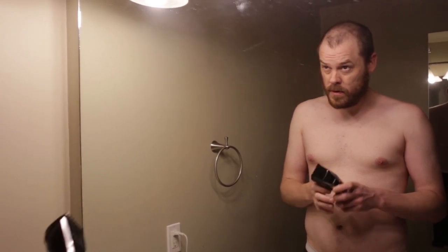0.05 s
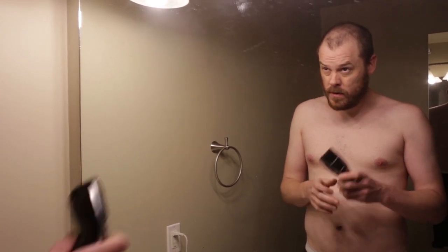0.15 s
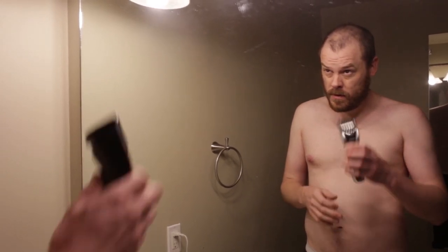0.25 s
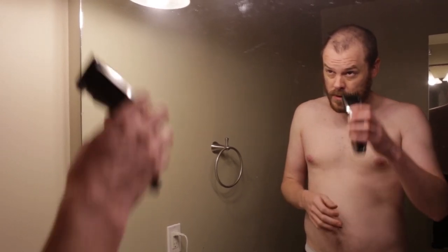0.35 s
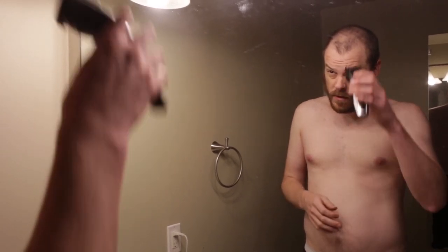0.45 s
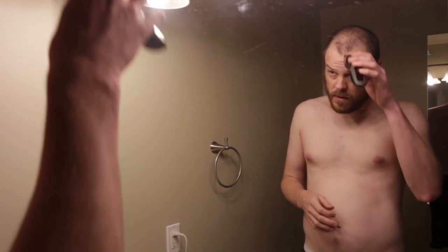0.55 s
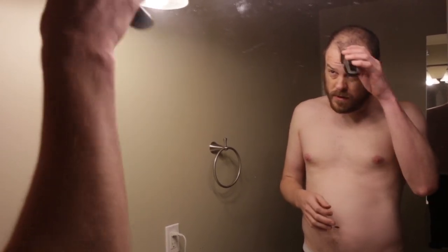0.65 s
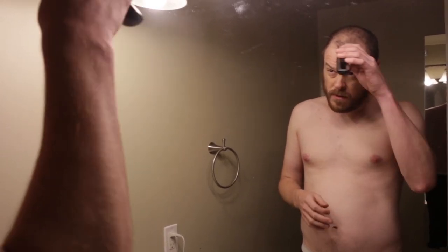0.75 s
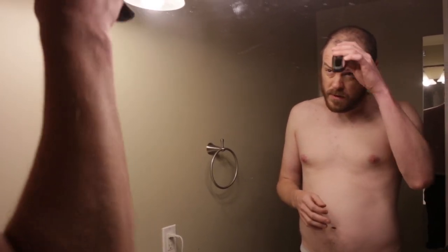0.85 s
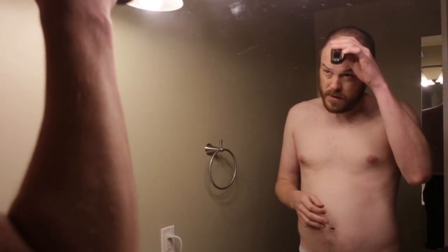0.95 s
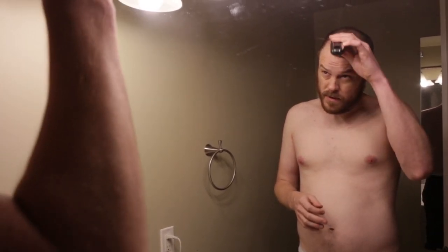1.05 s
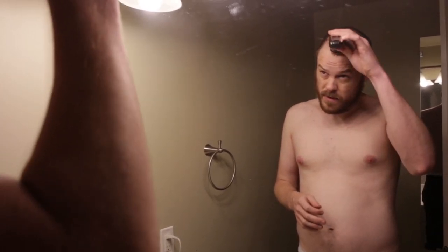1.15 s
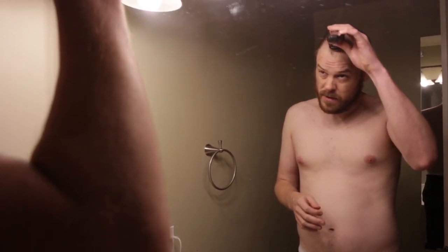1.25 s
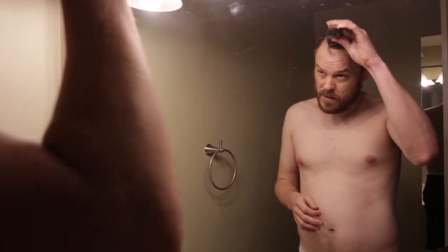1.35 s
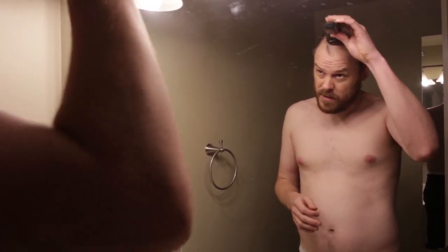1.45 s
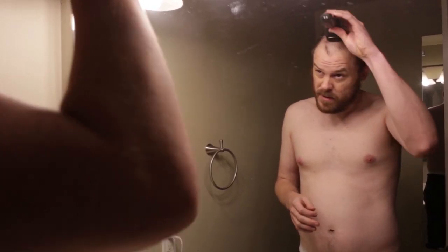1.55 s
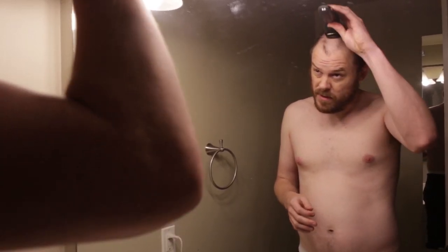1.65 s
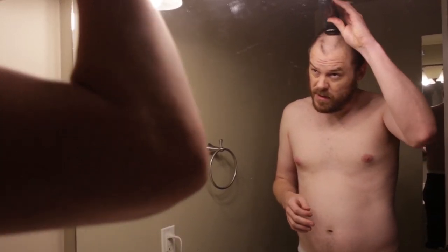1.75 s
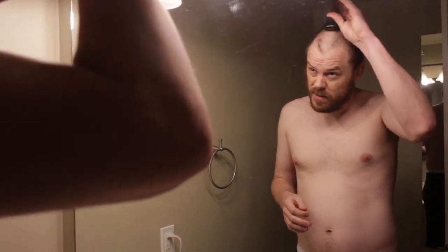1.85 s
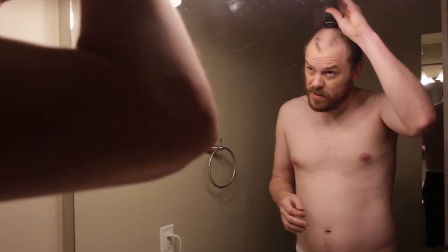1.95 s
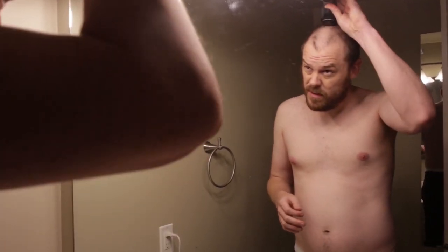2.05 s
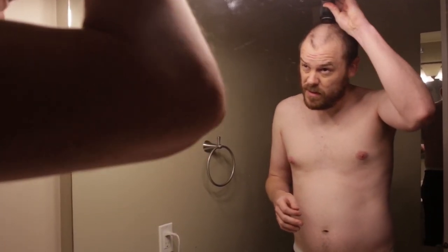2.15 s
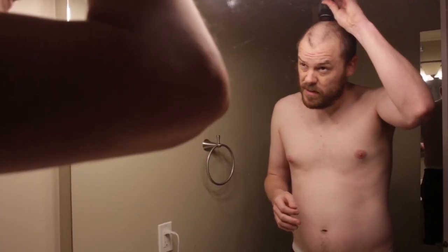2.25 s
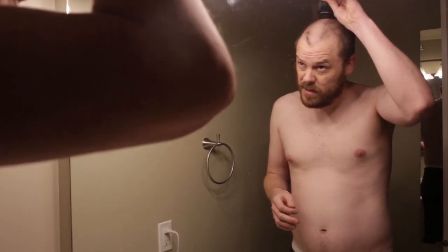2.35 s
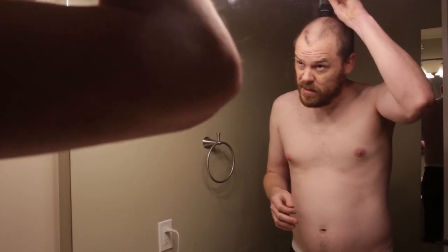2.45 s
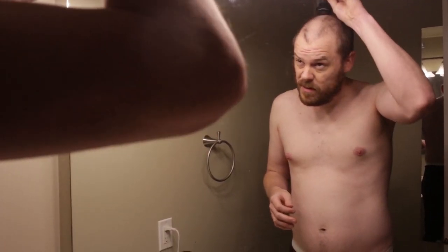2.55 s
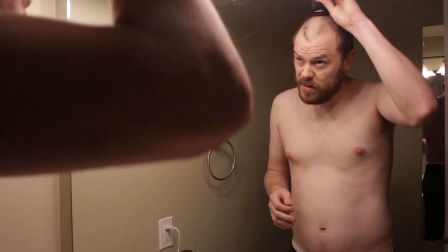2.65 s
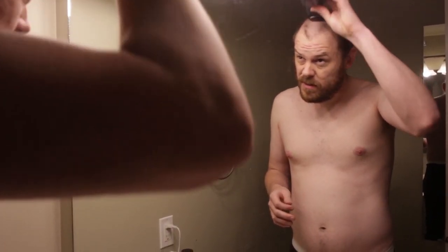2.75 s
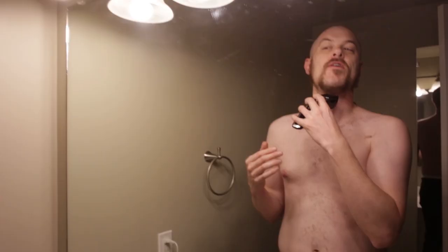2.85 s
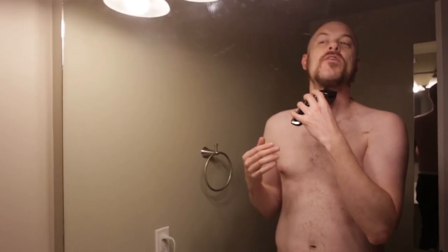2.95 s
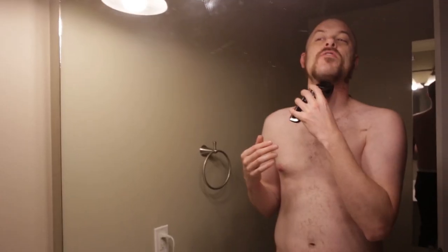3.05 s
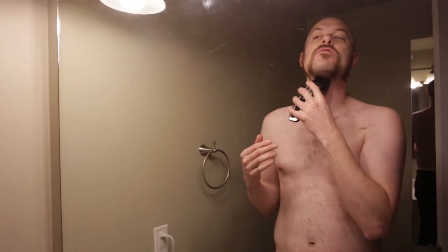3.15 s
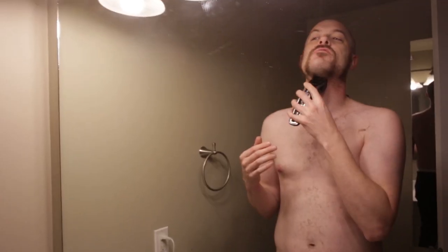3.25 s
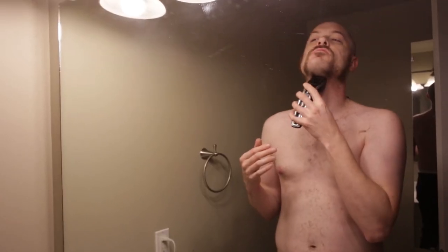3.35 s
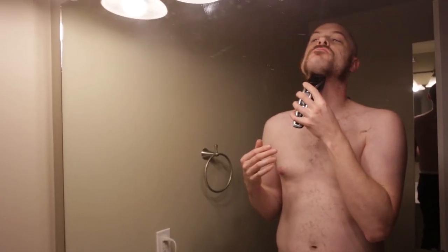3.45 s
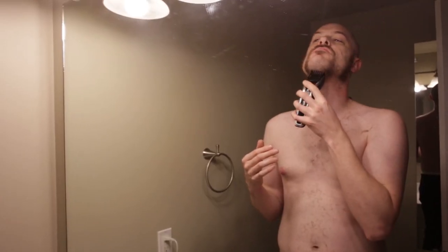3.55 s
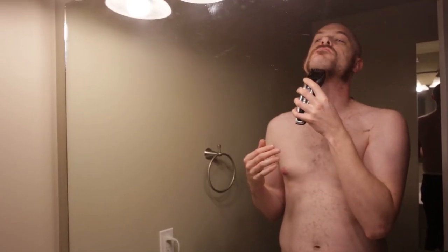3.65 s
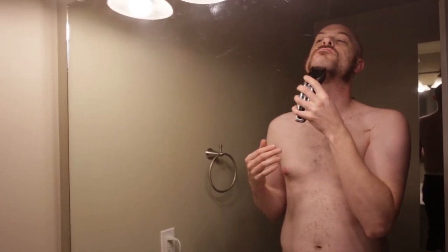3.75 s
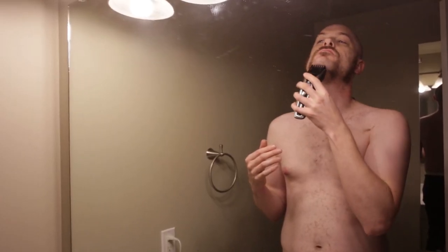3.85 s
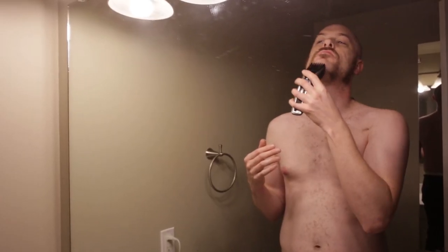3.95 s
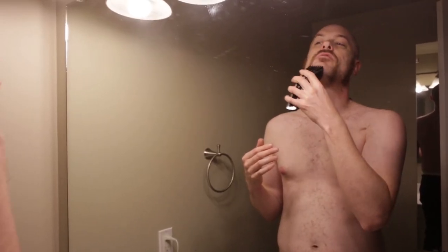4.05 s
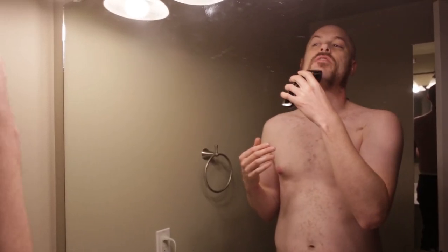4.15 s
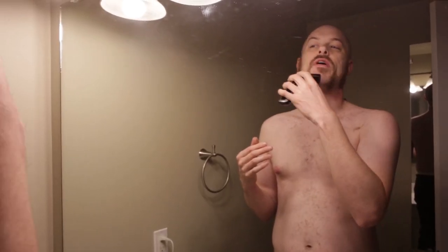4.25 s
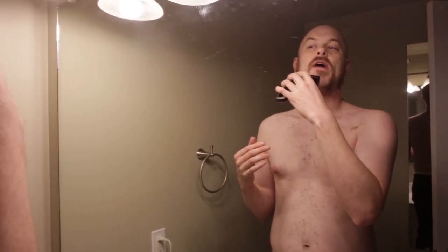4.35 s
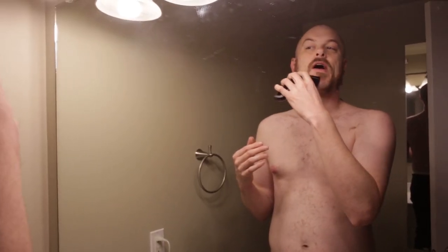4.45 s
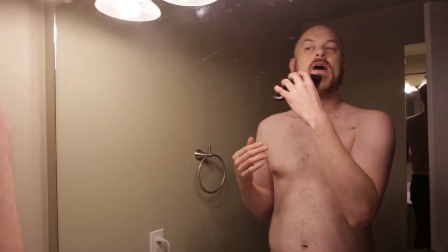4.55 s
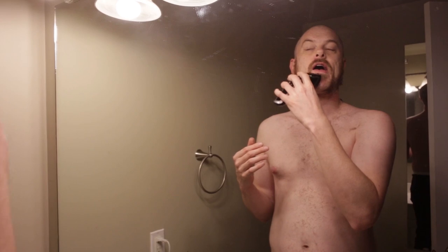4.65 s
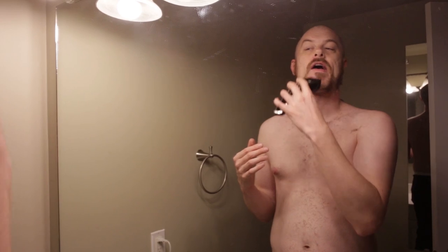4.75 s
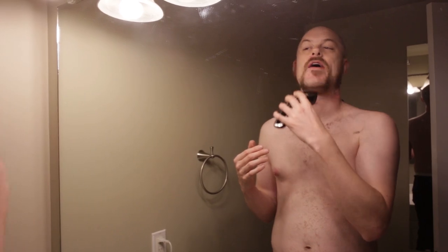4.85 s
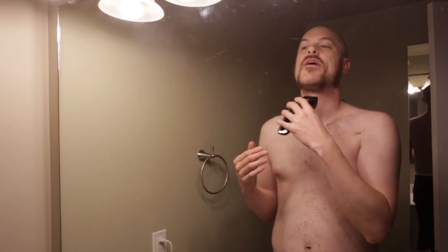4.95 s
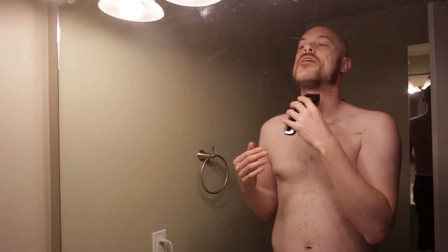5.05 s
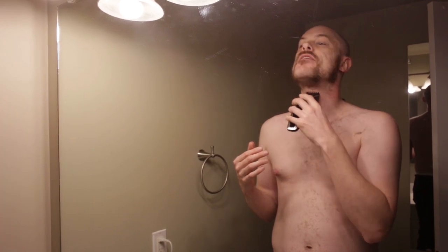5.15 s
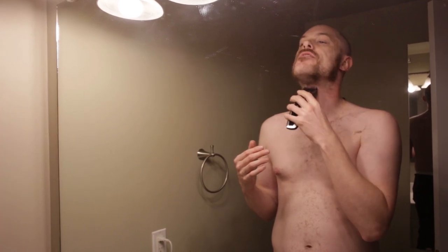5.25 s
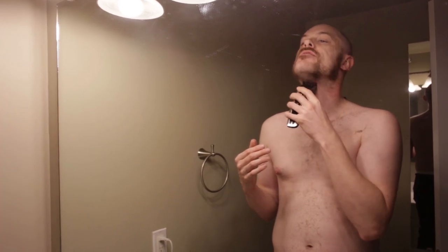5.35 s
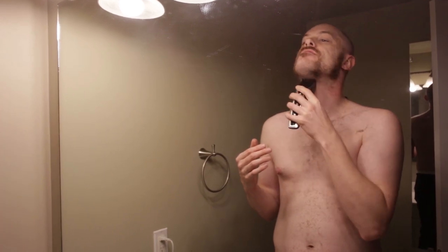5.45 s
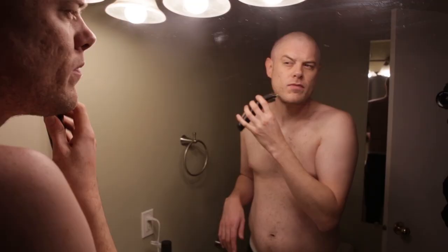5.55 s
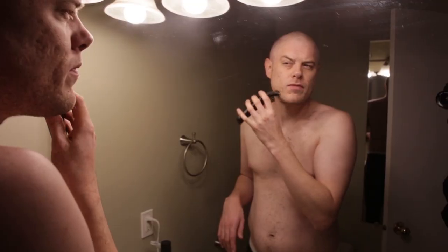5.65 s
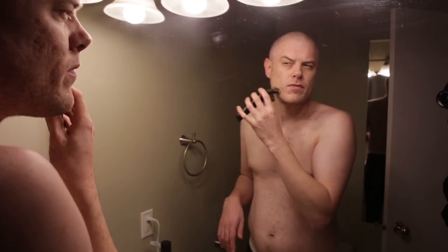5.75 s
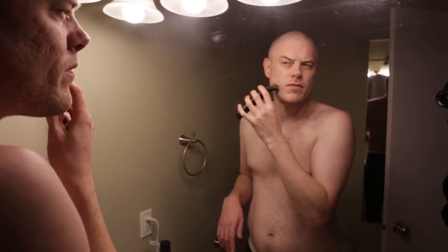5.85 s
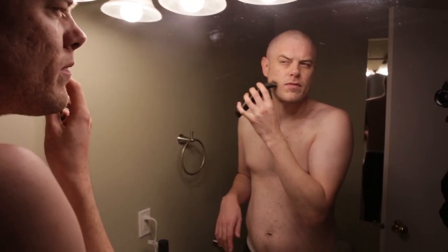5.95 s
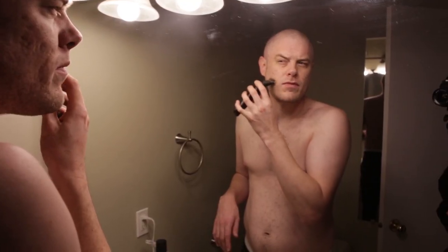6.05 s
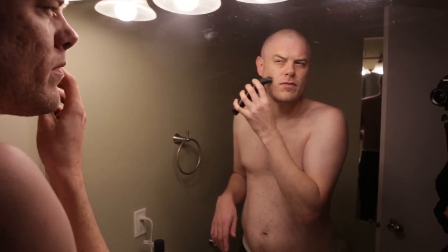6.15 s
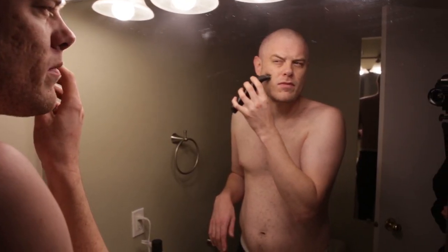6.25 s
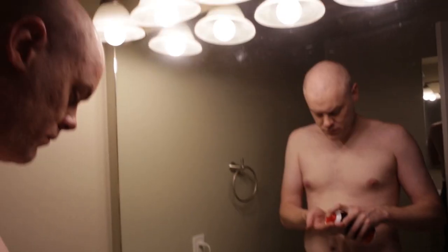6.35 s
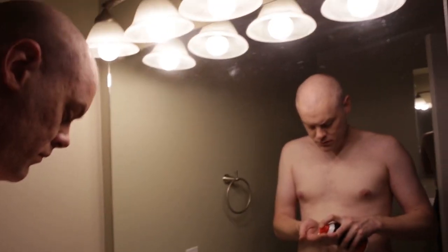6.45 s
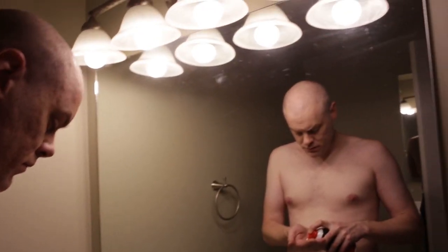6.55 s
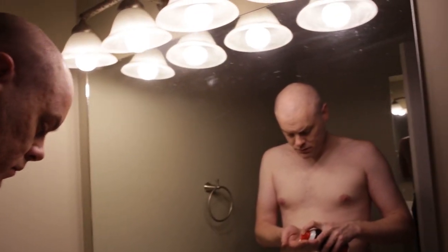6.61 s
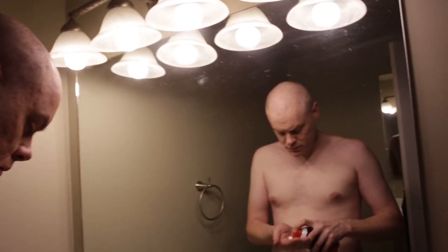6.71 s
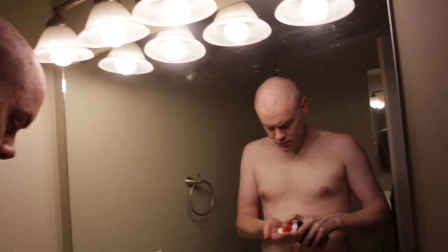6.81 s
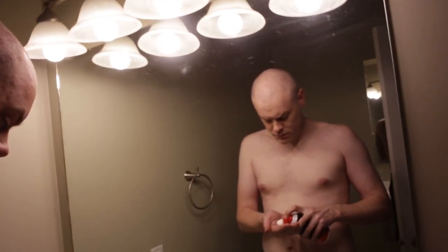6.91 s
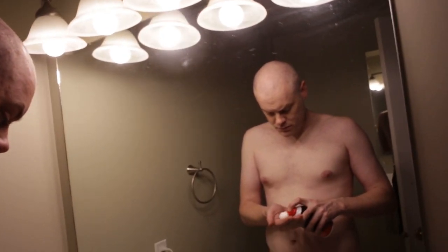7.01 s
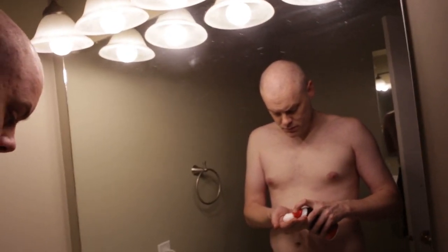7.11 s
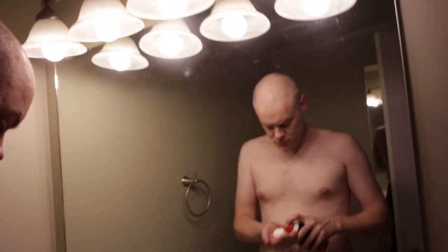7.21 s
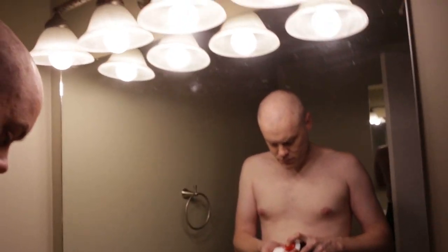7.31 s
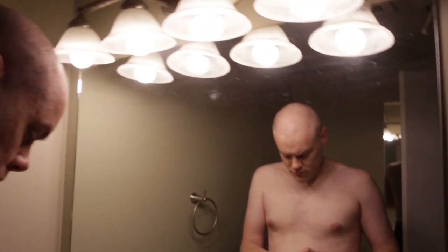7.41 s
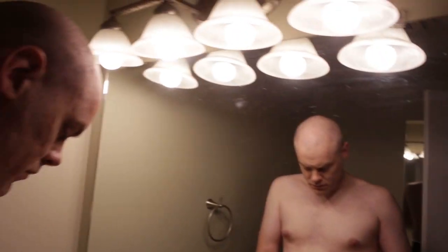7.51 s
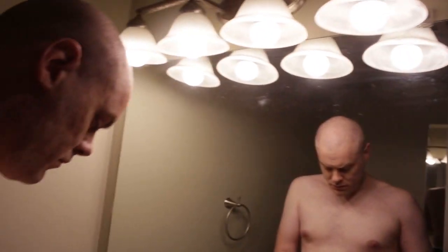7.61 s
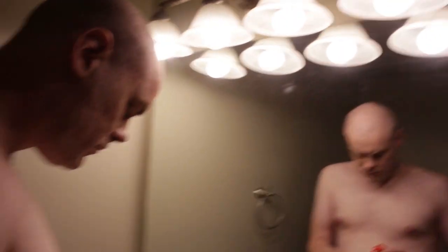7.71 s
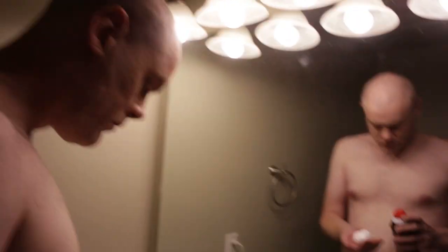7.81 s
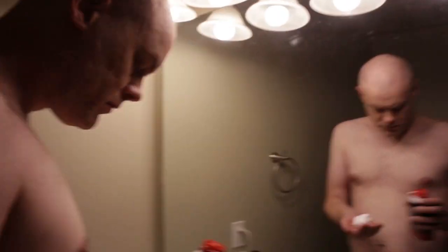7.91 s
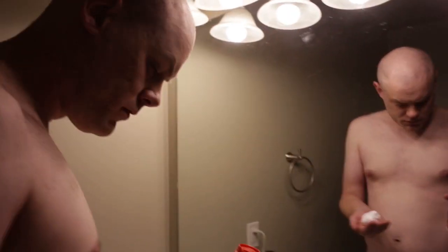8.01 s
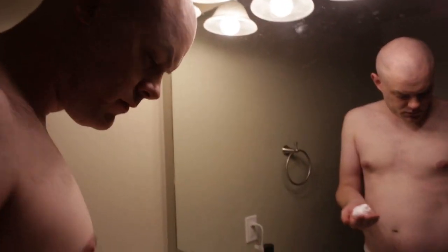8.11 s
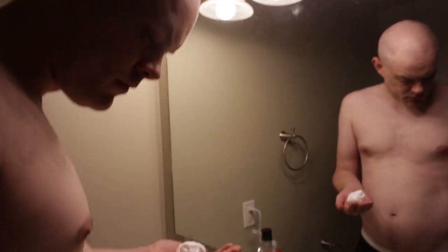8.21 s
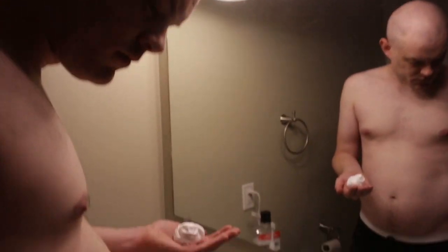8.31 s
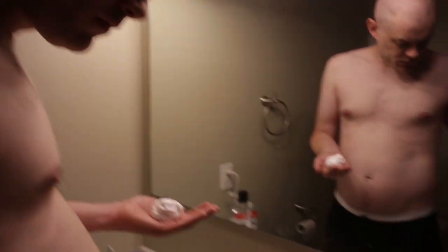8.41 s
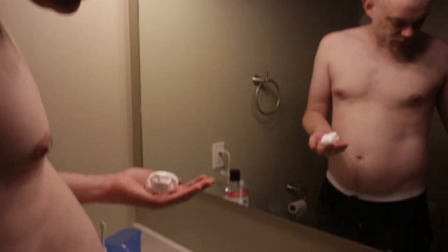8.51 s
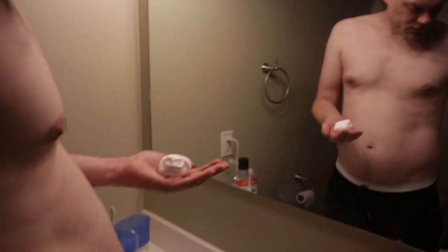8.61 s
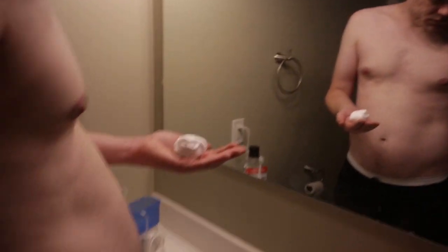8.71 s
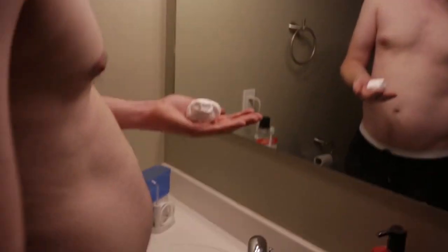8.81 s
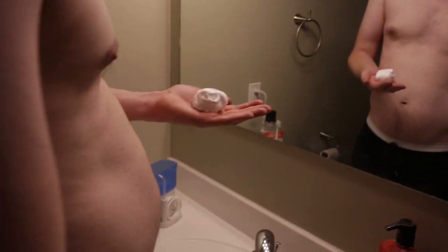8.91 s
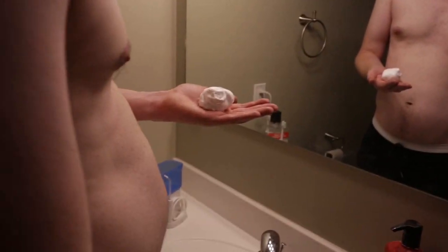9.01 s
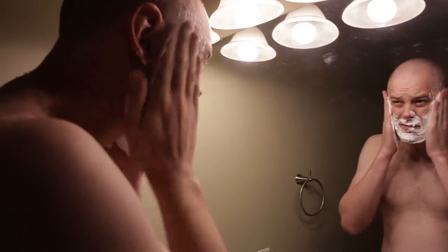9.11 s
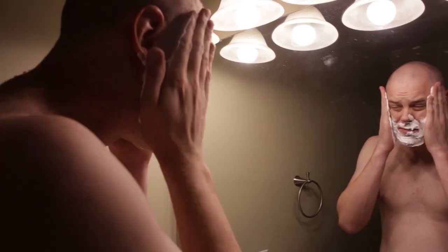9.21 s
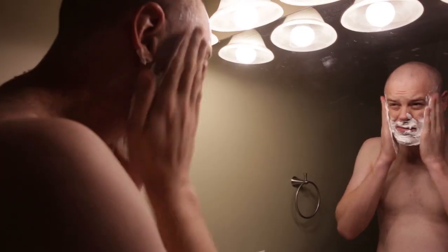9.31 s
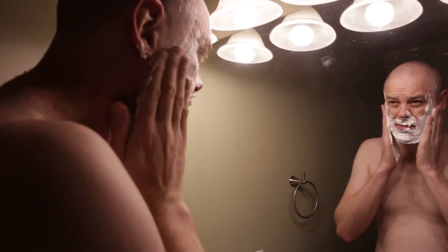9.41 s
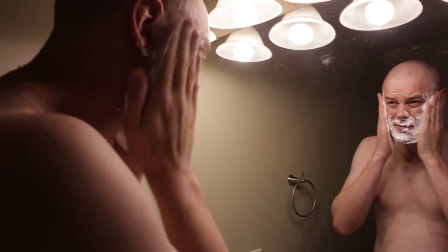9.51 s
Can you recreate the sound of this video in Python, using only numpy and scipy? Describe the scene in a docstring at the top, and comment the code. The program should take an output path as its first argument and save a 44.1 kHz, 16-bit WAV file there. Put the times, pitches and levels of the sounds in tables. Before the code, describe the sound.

Small reverberant bathroom, close microphone. From 0 to 2.9 s electric clippers buzz at about 115 Hz, with bright blade ticks and shifting tone as they move over the scalp; crackling hair crunches thicken from about 0.9 to 2.6 s, making the motor stumble slightly. At 2.9 s it cuts to a lower buzz near 98 Hz trimming a beard, with soft bumps at 2.9 and 3.3 s, strongest around 3.2 s, then steadier with sparse crunches. At 5.6 s a cut brings low extractor fan air and a dense, hissing, whining shaver rasp, firmer from 5.8 s, stopping at 6.34 s. A plastic cap clacks sharply at 6.76 s. Foam sputters, pops and gurgles from 6.87 to 7.55 s, weakening. Light clicks, scuffs and dull thumps follow until 8.5 s, with faint wet finger crackles. A cupped palm slaps skin at 9.05 s, its echo clipped; then fan and faint rubs.

```python
"""Shaving in a small bathroom, in order of time. Electric clippers mow a scalp, then trim a beard: a cam shakes
the housing (harmonics of the blade rate), the blade ticks at each stroke end, hairs crunch in noise grains.
With an extractor fan running, a shaver rasps over stubble (dense grains, whine) and stops; soft finger rubs
crackle now and then after that. A can's cap clacks (noise bursts, modes), foam sputters (grains, ringing bubbles),
small things are handled (click, scuff, thump), and a lathered palm slaps the skin (sine pops, noise)."""
import sys
import numpy as np
from scipy import signal
from scipy.fft import rfft, irfft, next_fast_len
from scipy.io import wavfile
from scipy.ndimage import map_coordinates

SR = 44100
rng = np.random.default_rng(int(sys.argv[2]) if len(sys.argv) > 2 else 0)


def unload_wav(signal):
    """Save mono or channel-first audio to the path in sys.argv[1] as 16-bit WAV at rate SR, clipped to [-1, 1]."""
    wavfile.write(
        sys.argv[1],
        SR,
        np.round(np.clip(np.atleast_2d(signal).T, -1, 1) * 32767).astype(np.int16),
    )


N = 422037
TIME = np.arange(N) / SR
BEARD_S, SHAVER_S, SHAVER_OFF_S, FOAM_S = 2.905, 5.605, 6.3415, 6.84
ROOM_T60_S, CUTOFF_HZ = 0.34, 15720


def from_db(db):
    """Decibels to gain."""
    return 10 ** (np.asarray(db) / 20)


def rms_one(x):
    """Scale to rms 1."""
    return x / np.sqrt(np.mean(np.abs(x) ** 2) + 1e-20)


def during(start_s, end_s):
    """Sample times of one stretch."""
    return TIME[round(start_s * SR):round(end_s * SR)]


def add(out, start_s, x):
    """Mix x into out from a given second."""
    i = round(start_s * SR)
    out[i:i + len(x)] += x[:N - i]


def curves(rows, t):
    """Each column of a control table, interpolated at the times t."""
    s, *columns = np.transpose(rows)
    return [np.interp(t, s, c) for c in columns]


def drift(t, rate):
    """Random curve, linear between knots, rms 1; rate = knots per unit of t."""
    knots = rng.standard_normal(4096)
    return rms_one(map_coordinates(knots, [(t - t[0]) * rate + 2], order=1, mode="wrap"))


def swell(t, s, length_s):
    """A smooth rise and fall of height 1 around the second s."""
    return np.exp(-2 * ((t - s) / length_s) ** 2)


def colour(x, spectrum):
    """Causal (minimum-phase) filter with the given spectrum; rms 1."""
    size = 2 * next_fast_len(len(x) // 2 + 4096)
    hz, db = np.transpose(spectrum)
    bins_hz = np.maximum(np.fft.rfftfreq(size, 1 / SR), 1)
    skirt_db = -24 * np.maximum(np.log2(hz[0] / bins_hz), 0)  # 24 dB per octave below the first row
    target_db = np.interp(np.log(bins_hz), np.log(hz), db) + np.maximum(skirt_db, -60)
    cepstrum = irfft(np.log(from_db(target_db)))
    response = np.exp(2 * rfft(cepstrum[:size // 2], size))
    return rms_one(irfft(rfft(x, size) * response)[:len(x)])


def bathroom(x, wet_db):
    """Direct sound plus dense reflections from mirror and walls, drawn anew at every call."""
    t = TIME[:SR // 2]
    tail = rng.standard_normal(len(t)) * from_db(-60 * t / ROOM_T60_S) * (t > .002)
    return x + from_db(wet_db) * signal.fftconvolve(x, tail / np.linalg.norm(tail))[:len(x)]


def grains(t, per_s, spread_db):
    """Tiny snaps of uneven size at random moments; rms 1."""
    sizes = from_db(spread_db * np.minimum(rng.exponential(1, len(t)), 4))
    return rms_one(sizes * rng.standard_normal(len(t)) * (rng.random(len(t)) < per_s / SR))


def burst(spectrum, t60_s, wet_db):
    """A short contact noise with its reflections; rms 1 over the first 10 ms."""
    t = TIME[:SR // 2]
    noise = rng.standard_normal(len(t)) * from_db(-60 * t / t60_s)
    x = colour(bathroom(noise, wet_db), spectrum)
    return x / np.std(x[:SR // 100])


def ringing(modes):
    """Struck modes dying away."""
    t = TIME[:SR // 2]
    return sum(from_db(db - 60 * t / t60_s) * np.sin(2 * np.pi * (hz * t + rng.random()))
               for hz, db, t60_s in modes)


def brighten(x, shelf_db, hinge_hz):
    """See-saw of the treble against the rest."""
    low = signal.sosfiltfilt(signal.butter(3, hinge_hz, fs=SR, output="sos"), x)
    return low * from_db(-shelf_db / 2) + (x - low) * from_db(shelf_db / 2)


# quiet room and extractor fan air, relative density: [f/Hz, level/dB]
QUIET_ROOM_SPECTRUM = [(25, -14), (60, -12), (130, -2.5), (220, -5), (420, -2), (700, -9), (2000, -3),
                       (15000, -17.5)]
FAN_SPECTRUM = [(28, -20), (45, -7), (70, -2), (95, -7.5), (135, -2), (210, -5), (300, -2), (420, -3.5),
                (560, -8), (900, -9), (1300, -13.5), (2000, -16.5), (4000, -24.5), (5500, -31.5),
                (8000, -34.5), (11000, -36), (15500, -67)]
# fan motor tones: [f/Hz, mean level/dB]
FAN_TONES = [(118.4, -58.5), (260.6, -63.5), (360.7, -59)]
QUIET_DB, QUIET_HUM_HZ, QUIET_HUM_DB, FAN_DB = -63.5, 119, -66.5, -48.5


def background():
    """Faint room noise and hum under the clippers, then fan air noise with wavering motor tones."""
    quiet = from_db(QUIET_DB) * colour(rng.standard_normal(N), QUIET_ROOM_SPECTRUM)
    quiet = quiet + from_db(QUIET_HUM_DB) * np.sin(2 * np.pi * QUIET_HUM_HZ * TIME)
    fan = from_db(FAN_DB) * colour(rng.standard_normal(N), FAN_SPECTRUM)
    for hz, db in FAN_TONES:
        gain = np.sqrt(2) * from_db(db + 2 * drift(TIME, 9.9))
        fan = fan + gain * np.sin(2 * np.pi * hz * TIME + .5 * drift(TIME, 12))
    return np.where(TIME < SHAVER_S, quiet, fan)


# soft rubs of the fingers on can and lather: [t/s, length/s, level/dB]
RUBS = [(6.45, .07, -67), (6.844, 0.07, -52.5), (7.755, .07, -69), (8.49, .05, -68), (8.795, .05, -63),
        (9.23, 0.047, -63.5), (9.41, 0.057, -62.5), (9.532, 0.057, -70)]
# wet crackle, relative density: [f/Hz, level/dB]
LATHER_SPECTRUM = [(2500, -6), (5000, -1), (8000, 3), (11000, 2), (14000, -6), (15700, -18)]


def lather():
    """Each stroke of the fingers gives a fine, wet crackle."""
    strokes = sum(from_db(db) * np.exp(-((TIME - s) / length_s) ** 2) for s, length_s, db in RUBS)
    return strokes * colour(grains(TIME, 6000, 1.1), LATHER_SPECTRUM)


# clippers landing on the chin: [t/s, level/dB]
BUMPS = [(2.92, -59), (3.335, -60.5)]
# dull thump, also under handling, relative density: [f/Hz, level/dB]
THUMP_SPECTRUM = [(50, -14), (120, 8.5), (300, -1.5), (600, -6), (1500, -47)]


def bumps():
    """The clippers land on the skin with a soft, dull thud of decaying noise."""
    out = np.zeros(N)
    for s, db in BUMPS:
        add(out, s, from_db(db) * burst(THUMP_SPECTRUM, 0.088, 0.5))
    return out


# touches; ring, treble, thump against the click:
# [t/s, level/dB, t60/s, colour f/Hz, ring/dB, treble/dB, thump/dB]
TOUCHES = [(7.495, -40, 0.02, 3500, -20, -18, -18), (7.521, -55, .05, 2000, -20, -18, -15),
           (7.695, -46, 0.023, 2920, -20, -28, -5), (7.857, -40.5, 0.025, 2720, -6, -18, -28),
           (7.906, -42, 0.04, 3000, -15, -12, -3), (7.913, -47, 0.07, 3700, -15, -0.5, 1),
           (8.097, -39, 0.035, 2700, -24, -9.5, -1), (8.108, -48, 0.032, 2200, -24, -8, 7),
           (8.117, -52, 0.019, 1200, -24, -12, 10), (8.22, -51.5, 0.059, 1500, -24, -13, 1),
           (8.256, -52, 0.08, 2000, -24, -13, 4), (8.267, -55, 0.064, 1200, -24, -13, 9),
           (8.538, -44, 0.022, 1740, -20, -22, 6)]
# click and bright scuff, relative density: [f/Hz, level/dB]
CLICK_SPECTRUM = [(200, -5), (700, 6), (1800, 4), (2800, -1), (4100, -5), (4700, -11.5), (9000, -27.5),
                  (15700, -62)]
SCUFF_SPECTRUM = [(3000, -21), (5500, -4), (7200, 3), (10000, -1), (11400, 0), (12100, 4), (12800, -4),
                  (15700, -15)]
# can ring when tapped: [f/Hz, level/dB, t60/s]
CAN_MODES = [(1534, -8, .08), (2062, -10, .09), (3025, -2, .08), (3950, 0, .12)]


def handling():
    """Each touch mixes a coloured click, a bright scuff, a dull thump and some can ringing."""
    out = np.zeros(N)
    for s, db, t60_s, colour_hz, ring_db, treble_db, thump_db in TOUCHES:
        click = burst(CLICK_SPECTRUM, t60_s, -2.5)
        click = click + 0.47 * signal.lfilter(*signal.iirpeak(colour_hz, 2, fs=SR), click)
        scuff = from_db(treble_db) * burst(SCUFF_SPECTRUM, t60_s, 3.0)
        thump = from_db(thump_db) * burst(THUMP_SPECTRUM, t60_s, -5)
        ring = from_db(ring_db) * ringing(CAN_MODES)
        add(out, s, from_db(db) * (click + scuff + thump + ring))
    return out


# knocks of the cap: [t/s, level/dB, t60/s]
CAP_KNOCKS = [(6.746, -47, 0.033), (6.7573, -32, 0.016), (6.760, -28.5, 0.025), (6.763, -29.5, .03),
              (6.7725, -34.5, .04), (6.781, -39, 0.046)]
# plastic cap, relative density: [f/Hz, level/dB]
CAP_SPECTRUM = [(500, -28), (1100, -9), (1400, -5.5), (1750, -7.5), (2000, 7), (2350, -8.5), (2750, 4.5),
                (3200, -6), (3600, -5.5), (4700, -14), (5800, -25), (8000, -22), (10000, -37), (15700, -57)]
# free ringing once snapped loose: [f/Hz, level/dB, t60/s]
CAP_MODES = [(1406, -36, 0.15), (2000, -28, 0.08), (2800, -27, 0.14), (2934, -33, .1), (3174, -28, 0.14),
             (3640, -47, .13), (4705, -47, .15)]
CAP_SNAP_S = 6.7578


def cap():
    """The plastic cap gives way in a quick run of knocks and rings briefly."""
    out = np.zeros(N)
    for s, db, t60_s in CAP_KNOCKS:
        add(out, s, from_db(db) * burst(CAP_SPECTRUM, t60_s, 0))
    add(out, CAP_SNAP_S, bathroom(ringing(CAP_MODES), -8))
    return out


# large bubbles bursting at the nozzle: [t/s, level/dB]
FOAM_POPS = [(6.9253, -35.5), (7.001, -43), (7.237, -40)]
# sputter, also of pops and bubbles, relative density: [f/Hz, level/dB]
SPUTTER_SPECTRUM = [(400, -24), (700, -4.5), (870, -10), (1020, -7), (1350, -2), (1650, -3.5), (1950, -1.5),
                    (2300, -5.5), (2700, -10), (3300, -13), (4500, -14), (7000, -43)]


def foam_pops():
    """Large bubbles burst in single sharp noise snaps that stand out of the sputter."""
    out = np.zeros(N)
    for s, db in FOAM_POPS:
        add(out, s, from_db(db) * burst(SPUTTER_SPECTRUM, 0.0088, -9))
    return out


BUBBLES_PER_S, BUBBLE_LOW_HZ, BUBBLE_HIGH_HZ = 500, 850, 2710
BUBBLE_CYCLES = 32  # to -60 dB


def bubbles(t):
    """Small gas pockets ring briefly, each at its own pitch; rms 1."""
    out, age_s = np.zeros(N), TIME[:SR // 20]
    span_s = t[-1] - t[0]
    for when, size, weakness in rng.random((int(BUBBLES_PER_S * span_s), 3)):
        hz = BUBBLE_LOW_HZ * (BUBBLE_HIGH_HZ / BUBBLE_LOW_HZ) ** size
        gain = from_db(-9 * weakness - 60 * age_s * hz / BUBBLE_CYCLES)
        add(out, when * span_s, gain * np.sin(2 * np.pi * hz * age_s))
    return colour(out[:len(t)], SPUTTER_SPECTRUM)


# gas pockets ringing in the growing foam: [t/s, length/s, f/Hz, level/dB]
GURGLES = [(6.9, 0.04, 1360, -33.5), (6.954, 0.037, 1200, -42), (6.97, 0.058, 1955, -38),
           (7.018, 0.033, 869, -35), (7.18, 0.045, 1320, -41), (7.248, 0.066, 1301, -35.5),
           (7.37, .05, 2000, -37), (7.44, 0.07, 878, -41)]
# spits of gas at the nozzle: [t/s, level/dB]
SPITS = [(6.885, -45), (7.298, -41.5), (7.508, -49)]
# fine fizz, relative density: [f/Hz, level/dB]
FIZZ_SPECTRUM = [(3500, -0.5), (5500, -2), (9000, 1), (11000, -9), (14500, -12), (15700, -22)]
VALVE_OPEN_S, VALVE_SHUT_S, VALVE_ATTACK_S, VALVE_RELEASE_S = 6.873, 7.55, 0.014, 0.03
SPUTTER_DB, SPUTTER_FADE_DB_PER_S = -36, 11
FIZZ_DB, FIZZ_FADE_DB_PER_S = -50, 3
SURGE_S, SURGE_LENGTH_S, SURGE_DB = 7.25, 0.052, 5
BUBBLES_DB = -3.5  # against the sputter
SPIT_LENGTH_S = 0.0067


def foam():
    """Gas bursts at the nozzle in uneven, weakening spurts and rings pockets in the foam, with a fine fizz."""
    t = during(FOAM_S, 7.8)
    age_s = t - VALVE_OPEN_S
    valve = np.clip(np.minimum(age_s / VALVE_ATTACK_S, (VALVE_SHUT_S - t) / VALVE_RELEASE_S), 0, 1)
    spurts = valve * from_db(0.47 * drift(t, 68.5))
    sputter_db = SPUTTER_DB - SPUTTER_FADE_DB_PER_S * age_s + SURGE_DB * swell(t, SURGE_S, SURGE_LENGTH_S)
    bursts = colour(grains(t, 3500, 1.4), SPUTTER_SPECTRUM)
    sputter = from_db(sputter_db) * (bursts + from_db(BUBBLES_DB) * bubbles(t))
    gurgle = 0
    for s, length_s, hz, db in GURGLES:
        cycles = np.cumsum(hz * (1 + 0.055 * drift(t, 160))) / SR
        gurgle = gurgle + from_db(db) * swell(t, s, length_s) * drift(t, 150) * np.sin(2 * np.pi * cycles)
    spits = sum(from_db(db) * swell(t, s, SPIT_LENGTH_S) for s, db in SPITS)
    fizz_gain = np.hypot(from_db(FIZZ_DB - FIZZ_FADE_DB_PER_S * age_s), spits)
    fizz = fizz_gain * colour(grains(t, 7000, 1.8), FIZZ_SPECTRUM)
    return bathroom(spurts * (sputter + gurgle + fizz), -1.6)


# cupped palm on skin, relative density: [f/Hz, level/dB]
SLAP_SPECTRUM = [(80, -31), (170, -14), (260, -7), (450, -6), (700, -6), (950, -5), (1270, 3), (1550, -7),
                 (2200, -13), (3000, -23.5), (4200, -28), (5400, -42), (6500, -37.5), (15700, -52)]
# pop of the palm, direct and off the near walls: [delay/s, level/dB]
SLAP_PATHS = [(0, -12), (.0062, -16), (0.0096, -20)]
SLAP_S, SLAP_END_S, POP_HZ, SMACK_DB = 9.0468, 9.109, 1275, -19.5


def slap():
    """A cupped palm pops on skin: the trapped air rings, the walls answer, and the echo ends abruptly."""
    t = during(SLAP_S, SLAP_END_S)
    age_s = t - t[0]
    pops = 0
    for delay_s, db in SLAP_PATHS:
        late_s = age_s - delay_s
        shape = np.exp(-((late_s - .0022) / 0.0023) ** 2)
        pops = pops + from_db(db) * np.sin(2 * np.pi * POP_HZ * late_s) * shape
    building = np.minimum(0.96 + age_s / .008, 1)
    smack = from_db(SMACK_DB) * burst(SLAP_SPECTRUM, 0.22, -5.0)[:len(t)] * building
    return (pops + smack) * np.clip((t[-1] - t) / 0.0011, 0, 1)


# rasp and hiss, relative density: [f/Hz, level/dB]
RASP_SPECTRUM = [(500, -2), (1000, -3.5), (1700, 2.5), (2300, 4), (2850, 4.5), (3400, -1.5), (4200, 4),
                 (4700, -6.5), (6500, -4), (9000, -22)]
HISS_SPECTRUM = [(4500, -6.5), (6500, -15.5), (7600, -3), (8800, -4), (10200, -1), (12000, -9),
                 (13500, -15), (15700, -24)]
# whine partials, mean peak level: [f/Hz, level/dB]
WHINE_PARTIALS = [(1066, -58), (1669, -59), (2283, -55), (2638, -72), (2745, -56), (3241, -64), (3962, -59),
                  (4307, -59)]
# light touch, then pressed in
PRESS_S, PRESS_RISE_S = 5.815, 0.0097
LIGHT_RASP_DB, PRESSED_RASP_DB = -43.5, -41
LIGHT_HISS_DB, PRESSED_HISS_DB = -44.5, -42.5
STUBBLE_PATCHY_DB = 0.5
BITE_S, BITE_LENGTH_S, BITE_DB = 6.079, 0.0079, 5  # one coarse patch


def shaver():
    """Stubble snaps densely in the foil over a wavering whine; the room rings on briefly when it stops."""
    t = during(SHAVER_S, 6.75)
    pressed = np.clip((t - PRESS_S) / PRESS_RISE_S, 0, 1)
    rasp_db = LIGHT_RASP_DB + pressed * (PRESSED_RASP_DB - LIGHT_RASP_DB) + STUBBLE_PATCHY_DB * drift(t, 35)
    rasp_db = rasp_db + BITE_DB * swell(t, BITE_S, BITE_LENGTH_S)
    hiss_db = LIGHT_HISS_DB + pressed * (PRESSED_HISS_DB - LIGHT_HISS_DB)
    rasp = from_db(rasp_db) * colour(grains(t, 6000, 2.2), RASP_SPECTRUM)
    hiss = from_db(hiss_db) * colour(grains(t, 12000, 1.0), HISS_SPECTRUM)
    warped_s = np.cumsum(1 + 0.00283 * drift(t, 25.4)) / SR
    whine = sum(from_db(db + 1.1 * drift(t, 7.6)) * np.sin(2 * np.pi * hz * warped_s)
                for hz, db in WHINE_PARTIALS)
    running = t < SHAVER_OFF_S
    return bathroom((rasp + whine) * running, -1.2) + hiss * running


# passing swells and dips of narrow bands in the clippers' buzz and ticks: [t/s, length/s, f/Hz, level/dB]
BAND_SWELLS = [(.08, 0.26, 945, -4), (.06, .16, 1950, 3), (0.21, .1, 1950, 9), (0.36, .16, 940, 4),
               (.35, .1, 2000, 5), (0.28, 0.083, 3100, 11), (0.37, 0.046, 3750, 8), (0.48, .12, 1530, 11),
               (.06, .1, 2750, 4), (0.83, 0.21, 1610, 4.5), (0.81, .25, 4200, 8), (.85, 0.1, 3100, 5),
               (1.063, 0.072, 730, 13), (.75, 0.3, 1260, 6), (1.14, .14, 1280, 6.5),
               (1.17, 0.13, 4300, 5.5), (1.4, 0.15, 2630, 8), (1.53, 0.22, 5500, 7), (1.53, 0.28, 1300, 4),
               (1.9, .2, 2240, 9), (1.95, 0.095, 1300, 12), (2.3, 0.3, 860, 5), (2.78, 0.15, 2020, 7.5),
               (2.82, 0.18, 1700, -4), (2.7, 0.12, 3270, 9), (2.86, .16, 2660, 6), (2.78, 0.13, 1200, 9),
               (2.85, 0.11, 1600, 7), (2.8, 0.18, 810, -2), (2.96, .12, 4800, 7), (3.23, 0.32, 2270, 7),
               (3.132, .18, 3100, 2.5), (3.15, .16, 3700, -10), (3.15, .12, 5200, 5), (3.18, 0.15, 1970, 8),
               (3.25, 0.28, 2150, -6), (3.35, 0.19, 3300, 7), (3.7, 0.33, 4580, -9), (3.92, 0.21, 5000, 4),
               (3.8, 0.27, 1420, -11), (3.7, .35, 2430, -8), (4.1, .3, 3050, -4), (4.35, 0.25, 2050, -1),
               (5.25, .3, 1480, -3), (4.5, 0.29, 3700, -8), (4.5, 0.065, 1970, 6), (4.6, 0.44, 4660, 5.5),
               (4.68, 0.14, 1570, -13), (4.72, .2, 5850, 5), (4.82, 0.1, 1970, 4), (4.85, 0.16, 5350, 7),
               (4.9, 0.097, 3400, 8), (5.05, .16, 3880, -11), (5.02, .14, 5000, -4), (5.2, 0.29, 2780, 2.5),
               (5.3, .12, 3350, 4), (5.51, .11, 3480, 8), (5.5, .12, 4100, 6)]
BAND_MIN_WIDTH_HZ, BAND_WIDTH_SHARE = 140, 0.04  # share of the frequency


def band_swells_db(t, hz):
    """Gain of the passing swells and dips of narrow bands: frequencies x times."""
    s, length_s, centre_hz, db = np.transpose(BAND_SWELLS)
    width_hz = np.maximum(BAND_MIN_WIDTH_HZ, BAND_WIDTH_SHARE * centre_hz)
    return (db * swell(hz[:, None], centre_hz, width_hz)) @ swell(t[:, None], s, length_s).T


LOAD_FLUTTER, FLUTTER_PER_S = 0.58, 35
WANDER_FROM = 11.2  # harmonics below this have long waves and change less


def drone(t, turns, travel, load, place, first, second, wander, tilt_db):
    """Housing harmonics, rms 1, shifting in the room's standing waves and fluttering under load."""
    coarse, coarse_travel = t[::100], travel[::100]
    moved = np.clip(place[::100], 0, 1)
    blade_hz = turns[-1] / (t[-1] - t[0])
    bands_db = band_swells_db(coarse, blade_hz * np.array(first)[:, 0])
    gains = []
    for (k, first_db), (_, second_db), band_db in zip(first, second, bands_db):
        reflected = wander * (drift(coarse_travel, 3.487) + 1j * drift(coarse_travel, 3.675))
        flutter = drift(coarse, FLUTTER_PER_S) + 1j * drift(coarse, FLUTTER_PER_S)
        flutter = LOAD_FLUTTER * np.sqrt(load[::100]) * flutter
        db = first_db + moved * (second_db - first_db) + tilt_db[::100] * np.log2(max(k, 7) / 14) + band_db
        standing = rms_one(1 + min(k / WANDER_FROM, 1) * (reflected + flutter))
        gains.append(from_db(db) * standing * np.exp(1j * rng.normal(0, 1.64)))
    gains = gains / np.sqrt(np.sum(np.abs(gains) ** 2, axis=0) / 2)
    out = 0
    for k, gain in enumerate(gains, 1):
        phase = np.interp(t, coarse, np.unwrap(np.angle(gain)))
        out = out + np.interp(t, coarse, np.abs(gain)) * np.cos(2 * np.pi * k * turns + phase)
    return out


# blade turned to the microphone, ticks dry; level against the reflected ticks: [t/s, length/s, level/dB]
FACING = [(3.147, 0.11, -2), (4.82, .14, -7)]
PATH_EVENNESS = 0.36  # 0 = room tints the ticks freely, 1 = not at all


def blade_ticks(t, turns, travel, load, spectrum, return_db, ring_s, wet_db, late_s):
    """A tick at each stroke end, uneven under load, rung by the blade, heard from a changing position."""
    clicks = np.zeros(len(t))
    for phase, db in [(.35, 0), (.68, return_db)]:
        at = np.interp(np.arange(int(turns[-1])) + phase, turns, np.arange(len(t)))
        late, stronger = rng.standard_normal((len(at), 2)).T * load[at.astype(int)]
        at = at + late * late_s * SR
        taps = at.astype(int)[:, None] + np.arange(-5, 7)  # sinc: ticks between samples
        clicks[taps] += from_db(db + 0.83 * stronger)[:, None] * np.sinc(taps - at[:, None])
    out = rms_one(clicks) * sum(from_db(db) * swell(t, s, length_s) for s, length_s, db in FACING)
    clicks = np.concatenate([clicks[:SR // 5], clicks])  # room already ringing at the start
    ring_t = TIME[:SR // 3]
    ring_shift, path_shift = SR // 100, SR // 50
    for position in range(12):
        distance = np.abs(travel / travel[-1] * 11 - position)
        nearness = np.cos(np.pi / 2 * np.minimum(distance, 1))
        ring = rfft(rng.standard_normal(len(ring_t)) * np.exp(-ring_t / ring_s))
        smear = np.roll(irfft(ring / np.abs(ring)), ring_shift)  # all-pass
        path = rfft(bathroom(smear, wet_db))
        path = np.roll(irfft(path / np.abs(path) ** PATH_EVENNESS), path_shift)
        heard = signal.fftconvolve(clicks, path)[ring_shift + path_shift:]
        out = out + nearness * rms_one(heard[:len(clicks)][-len(t):])
    hz, s, bins = signal.stft(colour(out, spectrum), SR, nperseg=1024)
    return signal.istft(bins * from_db(band_swells_db(t[0] + s, hz)), SR)[1][:len(t)]


# cut hair, relative density: [f/Hz, level/dB]
HAIR_SPECTRUM = [(300, -25), (650, -7.5), (1000, 6.5), (1500, 4), (2000, 12.5), (2600, 8), (3200, 9),
                 (4200, 1), (6000, -7.5), (7500, -8.5), (10000, -13), (13000, -21), (15700, -28)]
# tufts caught, crunch before hair_db: [t/s, length/s, crunch level/dB, blade rate dip f/Hz]
TUFTS = [(0.346, 0.054, -53.5, 0), (0.752, .025, -50.5, 0), (0.928, 0.068, -52.5, 1.2),
         (1.03, 0.04, -50, 2), (1.086, 0.039, -50.5, 2), (1.265, 0.031, -52, 0.1),
         (1.325, 0.065, -51.5, 1.17), (1.501, 0.12, -55, .5), (1.828, .03, -51.5, 0),
         (1.886, 0.031, -49, .5), (1.948, 0.072, -51, 3), (2.161, 0.031, -50.5, .5),
         (2.216, 0.047, -46.5, 2), (2.36, .04, -50.5, 0), (2.46, .025, -49.5, .2), (2.51, 0.04, -49.5, 0.4),
         (3.365, 0.047, -56, 0), (3.524, 0.028, -49, 0), (3.769, 0.05, -52, 0), (4.02, 0.025, -44, 0),
         (4.09, 0.044, -47, 0), (4.185, 0.027, -51, 0), (4.325, .05, -53, 0), (4.502, .03, -44, 0),
         (4.755, 0.025, -43.5, 0.3)]
# passes through standing hair, crunch before hair_db: [start t/s, end t/s, crunch level/dB]
PASSES = [(0.87, 1.39, -53), (1.382, 1.655, -55.5), (1.625, 2.64, -51), (3.33, 3.896, -61), (4.0, 4.9, -60),
          (5.435, 5.66, -52)]
PASS_EDGE_S, PASS_PATCHY_DB = 0.12, 1.5
STRAY_SWING_DB = 3  # single hairs between the tufts
STUMBLE_DB = -47  # crunch, before hair_db, at which the motor runs roughest


def clippers(t, rate, levels, grip, path, first, second, ticks, stray_db, wander, jitter,
             return_db, ring_s, wet_db, late_s, housing_db, blade_db, hair_db):
    """Hair crunches in step with the stroke, the motor stumbles; at some crunches the rate dips briefly."""
    base_hz, = curves(rate, t)
    drone_db, tick_db = curves(levels, t)
    tilt_db, bright_db = curves(grip, t)
    place, speed = curves(path, t)
    travel = np.cumsum(np.abs(speed)) / SR
    cutting, dip_hz = from_db(stray_db + STRAY_SWING_DB * drift(t, 24.93)), 0
    for start_s, end_s, db in PASSES:
        inside = np.clip(.5 + np.minimum(t - start_s, end_s - t) / PASS_EDGE_S, 0, 1)
        cutting = np.hypot(cutting, from_db(db + PASS_PATCHY_DB * drift(t, 30)) * np.sqrt(inside))
    for s, length_s, db, tuft_dip_hz in TUFTS:
        caught = swell(t, s, length_s)
        cutting = np.hypot(cutting, from_db(db) * caught)
        dip_hz = dip_hz + tuft_dip_hz * caught
    load = np.minimum(cutting / from_db(STUMBLE_DB), 1) ** 2
    turns = np.cumsum((base_hz - dip_hz) * (1 + (jitter * load + 0.00049) * drift(t, 70))) / SR
    # two cuts a cycle, one stronger
    shearing = rms_one(from_db(7.1 * np.cos(4 * np.pi * turns) + 3 * np.cos(2 * np.pi * turns)))
    crunch = colour(bathroom(grains(t, 2400, 2.6) * shearing, -0.99), HAIR_SPECTRUM)
    hair = from_db(hair_db) * cutting * crunch
    housing = drone(t, turns, travel, load, place, first, second, wander, tilt_db)
    blade = blade_ticks(t, turns, travel, load, ticks, return_db, ring_s, wet_db, late_s)
    blade = from_db(blade_db + tick_db) * blade
    return from_db(housing_db + drone_db) * housing + brighten(blade + hair, bright_db, hinge_hz=3960)


# before dips and jitter: [t/s, blade rate f/Hz]
BEARD_RATE = [(2.92, 99), (3.02, 98.7), (3.27, 97.8), (3.58, 98), (3.7, 98.36), (4.15, 98.53), (4.28, 99.2),
              (5.0, 98.8), (5.1, 99.1), (5.38, 98.7), (5.47, 98.3), (5.6, 98.2)]
# before housing_db, blade_db: [t/s, drone level/dB, tick level/dB]
BEARD_LEVELS = [(2.92, -42, -44.5), (3.13, -37, -40), (3.28, -37, -40), (3.75, -41.5, -42.5),
                (4.37, -43.5, -42.5), (4.85, -42.5, -43.5), (5.17, -42, -44), (5.32, -39.5, -44),
                (5.43, -41.5, -42.5), (5.46, -41, -40.5), (5.6, -41, -43)]
# angle in the hand: [t/s, housing tilt/(dB per octave), blade brightness/dB]
BEARD_GRIP = [(2.92, 1, 6.5), (3.14, 1.2, -4), (3.3, 0.77, -0.5), (3.55, -1.6, 4), (3.85, -1, 3),
              (4.3, -0.71, 4.5), (4.85, 0.017, 2), (5.05, 0.32, 6), (5.35, 0.93, 3), (5.46, 0.13, -3),
              (5.6, -0.61, 1)]
# hand: [t/s, place (0 chin, 1 lip), speed (1 = slow stroke)]
BEARD_PATH = [(2.92, 0.27, 1.546), (4.12, 0.18, 0.92), (4.28, 1, 0.97), (4.95, 0.85, 1.04),
              (5.15, 0.28, 1.28)]
# housing vibration, relative: [multiple of blade rate, level/dB]
CHIN_HARMONICS = [(1, -26), (2, -42.0), (3, -32.5), (4, -19), (5, -19.5), (6, -31), (7, -8), (8, -11),
                  (9, -20), (10, -11.5), (11, 4.5), (12, -3), (13, 1.5), (14, -5), (15, -11), (16, -5),
                  (17, 2), (18, -2), (19, -9), (20, -3.5), (21, -13), (22, 1), (23, -1), (24, -6), (25, -7),
                  (26, -6.5), (27, -12), (28, -3), (29, -5), (30, 0), (31, -4.5), (32, -13), (33, -1.5),
                  (34, -6.5), (35, -5), (36, -4)]
LIP_HARMONICS = [(1, -25), (2, -38), (3, -31), (4, -20), (5, -14), (6, -25), (7, -5.5), (8, -15.5),
                 (9, -12), (10, -6.5), (11, 1.5), (12, 1.0), (13, -4), (14, -3), (15, -6), (16, -4),
                 (17, -3.5), (18, 0.5), (19, -5.5), (20, 3.5), (21, -8), (22, -2.5), (23, -3), (24, -4),
                 (25, -15), (26, 0.5), (27, -10), (28, 1), (29, -12), (30, -10), (31, -5.5), (32, -7),
                 (33, -4.5), (34, -3.5), (35, -10), (36, -19)]
# ticks, relative density: [f/Hz, level/dB]
BEARD_TICK_SPECTRUM = [(3300, -22.5), (3620, -5), (4100, -5.5), (4900, -7), (5350, -5.5), (6000, -7.5),
                       (6500, -14.5), (8400, -19), (9400, -15), (11000, -22), (13000, -24.5), (15700, -44)]


def beard_clippers():
    """The clippers trim the beard at a slower blade rate, between chin and lip."""
    return clippers(during(BEARD_S, SHAVER_S), BEARD_RATE, BEARD_LEVELS, BEARD_GRIP, BEARD_PATH,
                    CHIN_HARMONICS, LIP_HARMONICS, BEARD_TICK_SPECTRUM,
                    stray_db=-68, wander=0.42, jitter=0.00072, return_db=-12.5, ring_s=0.00059,
                    wet_db=5.0, late_s=.000008, housing_db=1.5, blade_db=-3.0, hair_db=1.5)


# before dips and jitter: [t/s, blade rate f/Hz]
SCALP_RATE = [(0, 114.6), (.2, 113.9), (.75, 115.1), (1.2, 113.6), (1.7, 115), (2.1, 115.3), (2.38, 114.9),
              (2.5, 114.6), (2.75, 116.7), (2.899, 116.9)]
# before housing_db, blade_db: [t/s, drone level/dB, tick level/dB]
SCALP_LEVELS = [(0.0, -39.5, -44.5), (0.56, -43.5, -44.5), (0.75, -42.5, -44), (1.49, -43.5, -47),
                (1.68, -41.5, -45.5), (2.73, -43, -46), (2.9, -40.5, -43)]
# angle in the hand: [t/s, housing tilt/(dB per octave), blade brightness/dB]
SCALP_GRIP = [(0, 2, 8.5), (.22, 1, 8.5), (.34, 2, 2.5), (.47, 3, 10), (.6, 0, 6), (1.0, 0.5, 9),
              (1.45, -1.5, 11.5), (1.9, .5, 7.5), (2.35, -.5, 5.5), (2.7, 0, 5), (2.9, 2, 5)]
# hand: [t/s, place (0 forehead, 1 crown), speed (1 = slow stroke)]
SCALP_PATH = [(0, 0.3, 2.36), (.3, 0.051, 3.42), (.5, 0, 2.17), (.7, 0, 0.78), (1.62, 0, 0.72),
              (1.78, 0.96, 1.18), (2.55, 1, 0.48), (2.9, 0.75, 1.84)]
# housing vibration, relative: [multiple of blade rate, level/dB]
FOREHEAD_HARMONICS = [(1, -29), (2, -48), (3, -21.5), (4, -17), (5, -15.5), (6, -22), (7, -6), (8, 0),
                      (9, -3), (10, 1.5), (11, 2), (12, -4), (13, -6), (14, -3.5), (15, -1.5), (16, 0),
                      (17, -2), (18, -6), (19, -2), (20, -2), (21, -4.5), (22, -7.5), (23, -3), (24, -11),
                      (25, -3), (26, -9), (27, -5.5), (28, -10)]
CROWN_HARMONICS = [(1, -28), (2, -31), (3, -20), (4, -13.5), (5, -14), (6, -17), (7, -6), (8, 2.5), (9, 2),
                   (10, -10), (11, -2.5), (12, -3.5), (13, -8.5), (14, -3), (15, 4), (16, -4), (17, -1.5),
                   (18, -1), (19, -2), (20, -8.5), (21, -10), (22, 2), (23, 0), (24, -1), (25, -4),
                   (26, -4), (27, -4), (28, -8)]
# ticks, relative density: [f/Hz, level/dB]
SCALP_TICK_SPECTRUM = [(2900, -24.5), (3250, -4.5), (3700, -6.5), (4500, -9), (5800, -11), (6600, -16),
                       (8000, -23.5), (9600, -17), (11000, -21), (13000, -29), (15700, -43)]


def scalp_clippers():
    """The clippers mow the scalp at a faster blade rate, between forehead and crown."""
    return clippers(during(0, BEARD_S), SCALP_RATE, SCALP_LEVELS, SCALP_GRIP, SCALP_PATH,
                    FOREHEAD_HARMONICS, CROWN_HARMONICS, SCALP_TICK_SPECTRUM,
                    stray_db=-60.5, wander=0.64, jitter=0.004, return_db=-8.5, ring_s=0.0012,
                    wet_db=5.5, late_s=.00003, housing_db=0.86, blade_db=-2.03, hair_db=5.5)


def scene():
    """Scalp, beard and shaver follow each other directly; the can, foam and slap come after."""
    out = background() + lather() + bumps() + handling() + cap() + foam_pops()
    add(out, 0, scalp_clippers())
    add(out, BEARD_S, beard_clippers())
    add(out, SHAVER_S, shaver())
    add(out, FOAM_S, foam())
    add(out, SLAP_S, slap())
    return out[None]


def record(dry):
    """Steep elliptic low-pass."""
    return signal.sosfilt(signal.ellip(12, .1, 80, CUTOFF_HZ, fs=SR, output="sos"), dry)


dry = scene()
out = record(dry)
unload_wav(out)
```